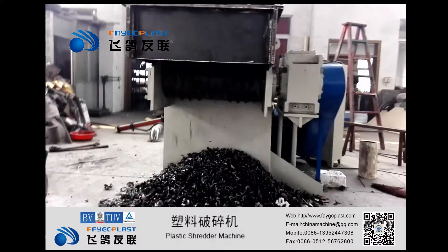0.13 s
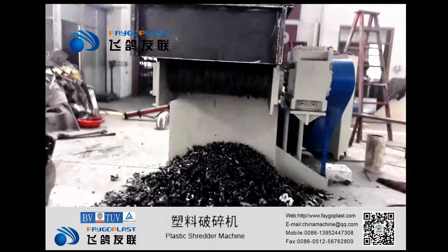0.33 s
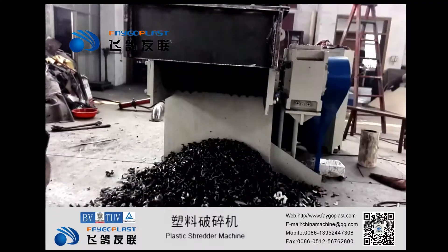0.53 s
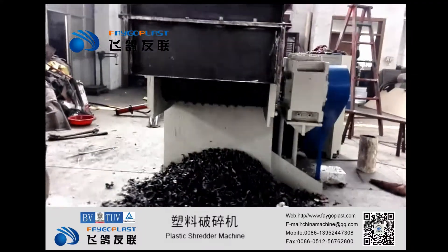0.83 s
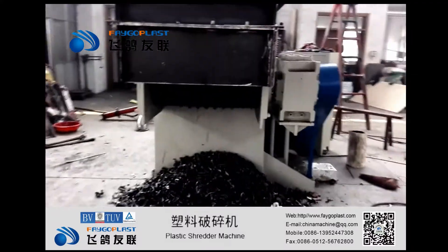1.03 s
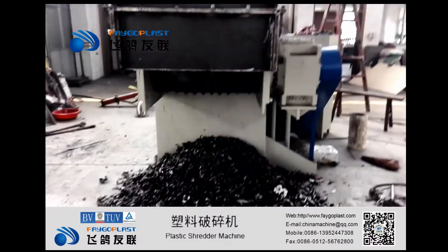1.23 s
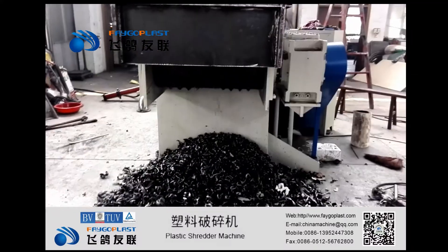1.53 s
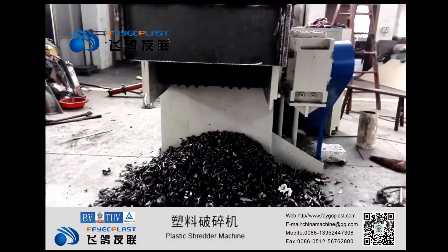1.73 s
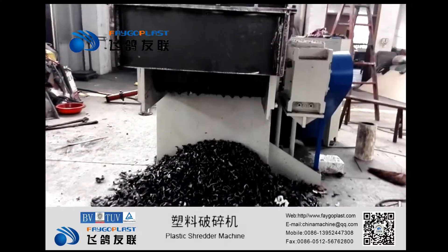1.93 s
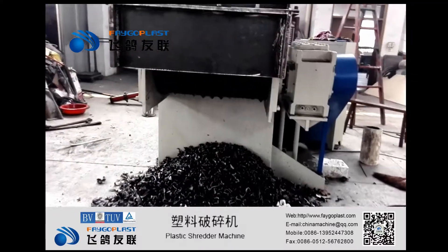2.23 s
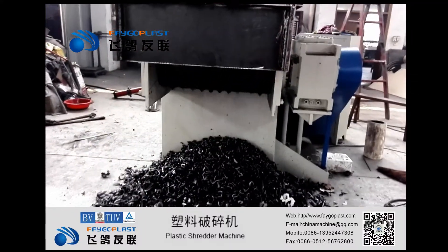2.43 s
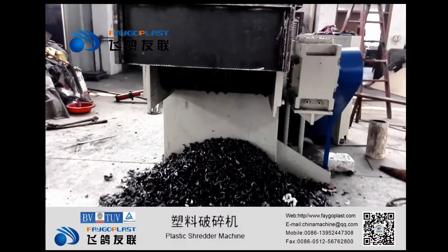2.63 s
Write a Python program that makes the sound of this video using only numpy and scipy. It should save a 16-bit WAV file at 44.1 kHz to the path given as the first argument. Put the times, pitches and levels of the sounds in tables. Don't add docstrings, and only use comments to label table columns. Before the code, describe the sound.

Plastic shredder roars and booms in a workshop as lumps clatter and chips crunch and hiss

```python
import sys
import numpy as np
from scipy import signal
from scipy.fft import rfft, irfft, next_fast_len
from scipy.io import wavfile
from scipy.ndimage import map_coordinates

SR = 44100
rng = np.random.default_rng(int(sys.argv[2]) if len(sys.argv) > 2 else 0)


def how_loud(loudness_db):
    steps = np.asarray(loudness_db, float) / 20
    return 10 ** steps


def wav_record(signal):
    frames = np.transpose(np.atleast_2d(signal))
    bounded = np.clip(frames, -1, 1)
    quanta = np.round(bounded * 32767).astype(np.int16)
    wavfile.write(sys.argv[1], SR, quanta)


N = 122157

# (time [s], level [dB])
ROTOR_LOAD = [(0, -18), (.24, -17), (.36, -22.5), (.56, -19.5), (.68, -24), (.9, -20.5), (1.2, -21.5),
              (1.42, -14.5), (1.72, -20.5), (1.97, -14.5), (2.1, -17), (2.22, -20), (2.47, -17.5),
              (2.77, -18)]
# (frequency [Hz], width [Hz], level [dB])
PANEL_MODES = [(82, 32, -13), (96.7, 9, -2.5), (145, 14, -9.5), (170.3, 18, -9.5), (193, 12.5, -2),
               (216, 24, -6), (246.3, 21.8, -2.5), (272, 15.8, -2), (376, 24, -5.5), (423.3, 33, -7.5),
               (502, 57, -9), (617, 41, -11.5), (727, 59, -9), (1023, 26, -7)]
# (frequency [Hz], level [dB per Hz])
DRIVE_SPECTRUM = [(24, -37), (52, -29), (80, -2), (258, 1.5), (330, -1.5), (549, -23), (725, -13.5),
                  (1180, -39), (2000, -24.5), (2600, -45), (4400, -120)]
# (time [s], peak [dB], favoured panel [Hz])
LUMP_THUMPS = [(0.02, -2, 195), (0.07, -16, 264), (0.121, -1.5, 208), (0.152, 1, 270), (0.199, -1, 151),
               (0.237, 2.5, 235), (0.501, -8, 206), (0.546, -0.5, 202), (0.579, 0, 272), (0.77, 1, 385),
               (0.982, -5.5, 187), (1.104, -4.5, 194), (1.298, -6.5, 194), (1.345, -6.5, 299),
               (1.382, -2.5, 229), (1.485, 0.5, 191), (1.827, -5, 258), (1.892, -4, 273), (1.952, 7.5, 193),
               (2.042, 4.5, 277), (2.087, -9, 272), (2.255, 0, 173), (2.33, -0.5, 195), (2.411, -19, 253),
               (2.521, -1.5, 218), (2.669, -11, 384), (2.731, 6.5, 359)]
# (time [s], peak [dB], favoured panel [Hz])
MORE_THUMPS = [(0, -5.5, 193), (.03, -4.5, 260), (.135, 3, 269), (.49, -9, 193), (.555, 0.5, 266),
               (1.0, -5, 376), (1.1, -7, 140), (2.04, -4, 191), (2.27, -8, 193), (2.49, -5, 376),
               (1.495, -14, 193), (1.952, 5.5, 272), (2.346, -10, 193), (2.736, 0, 193)]
# (time [s], peak [dB], pitch [Hz])
KNIFE_SNAPS = [(0.0333, -23.5, 1910), (0.176, -21, 1790), (0.2233, -21.5, 1926), (0.2644, -19, 2040),
               (0.4478, -18, 1810), (0.7391, -19.5, 1520), (0.7654, -19, 1560), (0.8014, -22, 2070),
               (0.9804, -13.5, 2004), (1.0194, -19.5, 1854), (1.1541, -28, 2760), (1.294, -14, 1954),
               (1.3923, -18.5, 1960), (1.477, -16, 1933), (1.6554, -15, 1516), (1.9591, -13.5, 1833),
               (2.0419, -21, 1820), (2.148, -13, 2467), (2.1779, -22, 2425), (2.3254, -20, 1884),
               (2.396, -12, 1800), (2.418, -27, 1727), (2.527, -11.5, 2250), (2.6444, -17, 1747),
               (2.6964, -15.5, 1580), (2.7298, -19, 2800)]
# (time [s], peak [dB], pitch [Hz], t60 [s], spread [octaves])
HARD_KNOCKS = [
    (1.1085, -9.5, 2650, 0.055, .22),
    (1.1083, -17, 1470, 0.088, 0.13),
    (1.3, -11.5, 2700, 0.019, 0.12),
    (1.9253, -14, 1370, 0.072, 0.18),
    (1.9245, -23, 2185, 0.22, 0.23),
    (1.945, -18, 1020, 0.15, 0.079),
    (2.2805, -10, 2300, 0.05, 0.2),
    (2.282, -11.5, 3713, 0.061, .14),
]
# (time [s], peak [dB], pitch [Hz])
WALL_CLACKS = [(0.027, -10, 1007), (0.094, -26, 567), (0.125, -15, 509), (0.176, -9, 1350),
               (0.243, -12, 503), (0.4, -14, 751), (0.439, -14, 540), (0.531, -13, 483), (0.586, -10, 606),
               (0.679, -20, 478), (0.743, -12, 727), (0.772, -9.5, 724), (0.803, -11, 632),
               (0.965, -22, 1045), (0.987, -16, 665), (1.015, -12.5, 754), (1.108, -14, 1370),
               (1.178, -21, 630), (1.234, -21, 1000), (1.312, -12, 853), (1.354, -14, 696),
               (1.385, -9.5, 751), (1.432, -13, 710), (1.486, -11.5, 520), (1.509, -14, 663),
               (1.6, -18, 746), (1.659, -13, 688), (1.689, -17, 724), (1.767, -17, 503), (1.833, -14, 740),
               (1.886, -21, 612), (1.925, -8, 504), (2.045, -9, 910), (2.145, -12.5, 842),
               (2.217, -16, 518), (2.281, -11.5, 859), (2.337, -8, 750), (2.416, -12, 686),
               (2.448, -11, 750), (2.519, -6, 759), (2.57, -10, 1055), (2.622, -18, 525), (2.672, -19, 630),
               (2.72, -15, 690), (2.738, -11, 640)]
# (time [s], peak [dB], pitch [Hz])
MORE_SNAPS = [(0.1174, -15, 1920), (0.3864, -19, 1570), (0.4928, -12, 1580), (0.5467, -12, 1550),
              (0.5791, -11, 1560), (0.9654, -15, 2040), (1.2401, -20, 1720), (1.3754, -10, 1890),
              (1.5424, -13, 1910), (1.6187, -15, 1950), (1.7374, -24, 2280), (1.8444, -27, 1560),
              (2.0847, -14.5, 1740), (2.2514, -22, 2180), (2.5544, -15, 1730)]
# (time [s], peak [dB], t60 [s], share of fine chips [0-1])
CHIP_SPRAYS = [(0.034, -16, 0.12, 0.35), (0.137, -19.5, 0.51, .5), (0.548, -15, 0.66, 0.95),
               (0.597, -17, 0.78, 0.24), (0.7645, -11.5, 0.53, 0.51), (0.802, -23, 1.9, 0.6),
               (.985, -19.5, 0.62, 0.23), (1.109, -15, 0.7, 0.17), (1.476, -13.5, 0.67, 0.6),
               (1.952, -20.5, 0.43, 0.9), (1.985, -20, 3.2, 0.13), (2.2795, -8, 0.31, 0.15),
               (2.325, -13.5, 1.34, 0.03), (2.43, -19.5, 0.45, 0), (2.643, -16, 0.33, 0)]
# (frequency [Hz], level [dB per Hz])
SHEET_SPECTRUM = [(880, -2.5), (1500, 0.5), (3340, -4), (4030, -2), (8180, -9.5), (10500, -19),
                  (11500, -90), (15000, -95), (22000, -120)]
# (time [s], level [dB])
CHIP_FLOW = [(0, -25), (.2, -26.5), (.37, -29.5), (.53, -28.5), (.72, -30), (1.08, -31), (1.42, -26),
             (1.62, -28), (1.82, -30.5), (2.05, -27), (2.24, -28), (2.45, -29), (2.6, -30), (2.77, -27)]
# (frequency [Hz], level [dB per Hz])
RATTLE_SPECTRUM = [(350, -68), (600, -4), (1030, -4.5), (1180, -4.5), (1960, -7.5), (4440, -13.5),
                   (7940, -13.5), (10500, -19), (11500, -126), (15000, -125), (22000, -120)]
# (frequency [Hz], correlation [0-1])
MIC_LIKENESS = [(60, 0.99), (250, 0.98), (500, 0.83), (1000, 0.59), (2000, 0.26), (4000, .02)]
# (frequency [Hz], difference [dB])
LEFT_OVER_RIGHT = [(300, 0.7), (1000, 0), (2000, -2.5), (3500, -0.5), (6200, 5)]
# (frequency [Hz], t60 [s])
HALL_DECAY = [(200, 0.17), (2000, 0.28), (10000, 0.91)]

FLUTTER_DB = 1.2


def unit(x):
    return x / np.sqrt(np.mean(x ** 2) + 1e-20)


def along(points, hz):
    f, v = np.transpose(points)
    return np.interp(np.log(hz + 1), np.log(f + 1), v)


def curve(rows):
    return np.interp(np.arange(N) / SR, *np.transpose(rows))


def wobble(rate):
    return map_coordinates(rng.standard_normal(400), [np.arange(N) * rate / SR])


def filtered(x, response):
    m = next_fast_len(N + SR // 2)
    return irfft(rfft(x, m) * response(np.fft.rfftfreq(m, 1 / SR)), m)[..., :N]


def toward_left(db):
    return how_loud([[db / 2], [-db / 2]])


def impacts(rate, spread_db):
    chance, side, luck = rng.random((3, 2, N))
    hardness = np.minimum(-np.log(luck + 1e-9), 2.2)
    return (chance < rate / SR) * np.sign(side - .5) * how_loud(spread_db * hardness)


def spread(pair, colour):
    def mid_side(hz):
        turn = np.arccos(np.clip(along(MIC_LIKENESS, hz), -1, 1)) / 2
        return colour(hz) * [np.cos(turn), np.sin(turn)]

    def balance(hz):
        return how_loud(along(LEFT_OVER_RIGHT, hz) * np.array([[.5], [-.5]]))

    mid, side = filtered(pair, mid_side)
    return unit(filtered(np.array([mid + side, mid - side]), balance))


def hall(x):
    hz, t, z = signal.stft(rng.standard_normal((2, SR // 3)), SR, nperseg=256)
    decay = how_loud(-60 * t / along(HALL_DECAY, hz)[:, None])
    tail = signal.istft(z * decay, SR, nperseg=256)[1]
    late = np.pad(x, (200, 0))[None]
    return signal.fftconvolve(late, tail / np.linalg.norm(tail[0]), axes=1)


def panel_boom():
    def steel(f):
        total = 0
        for k, (centre, width, db) in enumerate(PANEL_MODES):
            mode = 1j * f * width / (centre * centre - f * f + 1j * f * width)
            total = total + (-1) ** k * how_loud(db) * mode
        return total

    softness_hz = 610
    return spread(impacts(400, 1), lambda f: steel(f) / (1 + 1j * f / softness_hz))


def drive_roar():
    return spread(rng.standard_normal((2, N)), lambda f: how_loud(along(DRIVE_SPECTRUM, f)))


def hopper():
    boom_db, roar_db = -3.5, -5
    boom = how_loud(boom_db + FLUTTER_DB * wobble(15)) * panel_boom()
    roar = how_loud(roar_db + FLUTTER_DB * wobble(14)) * drive_roar()
    return how_loud(curve(ROTOR_LOAD)) * (boom + roar)


def thumps():
    level_db, rise_s, reach_octaves, damping = -4, 0.0099, 0.18, 0.89
    out, t = np.zeros(N + SR), np.arange(SR // 3) / SR
    hz, width, panel_db = np.transpose(PANEL_MODES)[:, :, None]
    for s, db, favoured_hz in LUMP_THUMPS + MORE_THUMPS:
        distance = np.abs(np.log2(hz / favoured_hz))
        gain = how_loud(db + level_db + panel_db * 0.29 - 6 * distance / reach_octaves)
        phase = 0.31 * rng.random(hz.shape)
        ring = gain * np.exp(-np.pi * width * damping * t) * np.sin(2 * np.pi * (hz * t + phase))
        out[round(s * SR):][:len(t)] += ring.sum(0) * (1 - np.exp(-t / rise_s))
    return out[:N]


def torn_off(rows, tear_s, lead_db):
    level_db, room_db, left_db = -20, -1, -2.3
    under_db, over_db = 3, 1.5
    out, t = np.zeros((2, N + 2 * SR)), np.arange(SR // 6) / SR
    for s, db, centre_hz, t60, octaves in rows:
        place, size, late = rng.random((3, 40, 1))
        off = (np.arange(40)[:, None] + place) / 10 - 2
        off[20], size[20] = 0, 0.5 + lead_db / 10
        age = np.maximum(t - tear_s * late ** 2, 0)
        loss_db = np.where(off < 0, under_db, over_db) * off ** 2
        decay_db = 60 * age / t60 * 2 ** (0.73 * off)
        tone = np.sin(2 * np.pi * centre_hz * 2 ** (octaves * off) * age)
        hit = how_loud(db + level_db) * (how_loud(10 * size - loss_db - decay_db) * tone).sum(0)
        wet = how_loud(room_db) * hall(hit)
        wet[:, :len(t)] += hit
        out[:, round(s * SR):][:, :wet.shape[1]] += wet
    return out[:, :N] * toward_left(left_db)


def snaps():
    t60, octaves = 0.076, .55
    return torn_off([(*row, t60, octaves) for row in KNIFE_SNAPS], tear_s=.022, lead_db=4)


def knocks():
    return torn_off(HARD_KNOCKS, tear_s=0.002486, lead_db=12)


def clacks():
    level_db, room_db, lead_db = -14.5, -3, 5
    spread_octaves, tear_s, ring_cycles = 0.398, .01, 50
    out, t = np.zeros(N + SR), np.arange(SR // 6) / SR
    for s, db, centre_hz in WALL_CLACKS + MORE_SNAPS:
        off, size, late = rng.standard_normal((3, 9, 1))
        off[0], size[0], late[0] = 0, lead_db / 3, 0
        hz = centre_hz * 2 ** (spread_octaves * off)
        age = np.maximum(t - tear_s * np.abs(late), 0)
        gain = how_loud(db + level_db + 3.6 * size - 60 * age * hz / ring_cycles)
        onset = 1 - np.exp(-age * hz / 1.24)
        out[round(s * SR):][:len(t)] += (gain * np.sin(2 * np.pi * hz * age) * onset).sum(0)
    return out[:N] + how_loud(room_db) * hall(out[:N])[:, :N]


def sprays():
    level_db, tail_db, left_db = -7.5, -3.5, 3.5
    rise_s, first_t60, fine_hz = 0.0016, 0.06, 6100
    t = np.arange(N) / SR
    grains = unit(impacts(4000, 1.0)) + 1.13 * rng.standard_normal((2, N))

    def above(f):
        return 1 / (1 + (fine_hz / (f + 1)) ** 6)

    coarse = unit(filtered(grains, lambda f: how_loud(along(SHEET_SPECTRUM, f)) * (1 - above(f))))
    fine = unit(filtered(grains, lambda f: how_loud(along(SHEET_SPECTRUM, f)) * above(f)))
    shapes = np.zeros((2, N))
    for s, db, t60, share in CHIP_SPRAYS:
        age = np.maximum(t - s, 0)
        fall = how_loud(-60 * age / first_t60) + how_loud(tail_db - 60 * age / t60)
        shape = how_loud(db) * (1 - np.exp(-age / rise_s)) * fall
        shapes += shape * np.sqrt(np.clip([[1 - share], [share]], 0, 1))
    return how_loud(level_db) * (shapes[0] * coarse + shapes[1] * fine) * toward_left(left_db)


def rattle_colour(f):
    return how_loud(along(RATTLE_SPECTRUM, f))


def crunch():
    level_db, clump_db, blur_t60 = -17.5, 4, 0.096
    t = np.arange(SR // 20) / SR
    blur = how_loud(-60 * t / blur_t60) * rng.standard_normal((2, len(t)))
    clumps = how_loud(clump_db * wobble(19)) * impacts(200, 7.5)
    blurred = signal.fftconvolve(clumps, blur, axes=1)[:, :N]
    pieces = spread(blurred, lambda f: rattle_colour(f) / (1 + (f / 3000) ** 2))
    return how_loud(curve(ROTOR_LOAD) + level_db) * pieces


def heap_hiss():
    level_db = 2
    hiss = spread(rng.standard_normal((2, N)), rattle_colour)
    return how_loud(curve(CHIP_FLOW) + level_db + FLUTTER_DB * wobble(14.17)) * hiss


def scene():
    machine = hopper() + thumps() + snaps() + knocks() + clacks()
    return machine + sprays() + crunch() + heap_hiss()


def low_pass(x):
    return signal.sosfilt(signal.butter(12, 11740, fs=SR, output="sos"), x)


def record(dry):
    ceiling, low_cut_hz, top_hz = .97, 42, 10700

    def band(hz):
        return 1 / (1 + (hz / top_hz) ** 120) / (1 + (low_cut_hz / (hz + 1)) ** 4)

    x = filtered(np.clip(dry, -ceiling, ceiling), band)
    return low_pass(np.clip(x, -1, 1))


dry = scene()
out = record(dry)
wav_record(out)
```